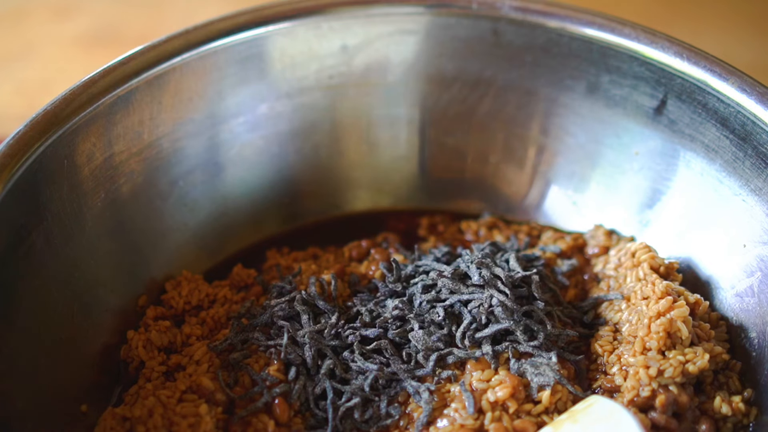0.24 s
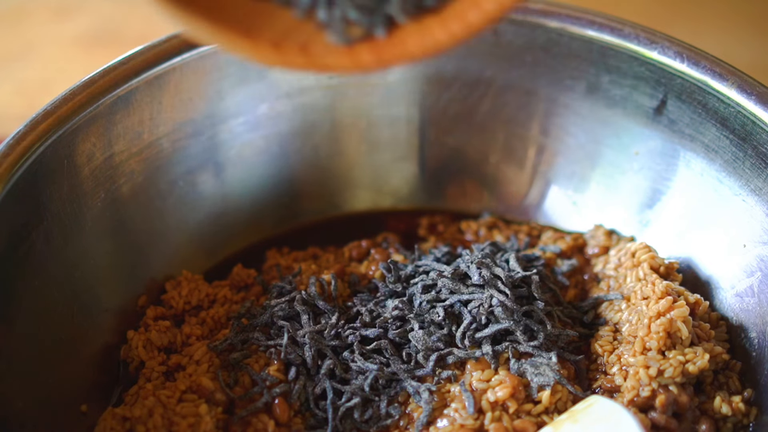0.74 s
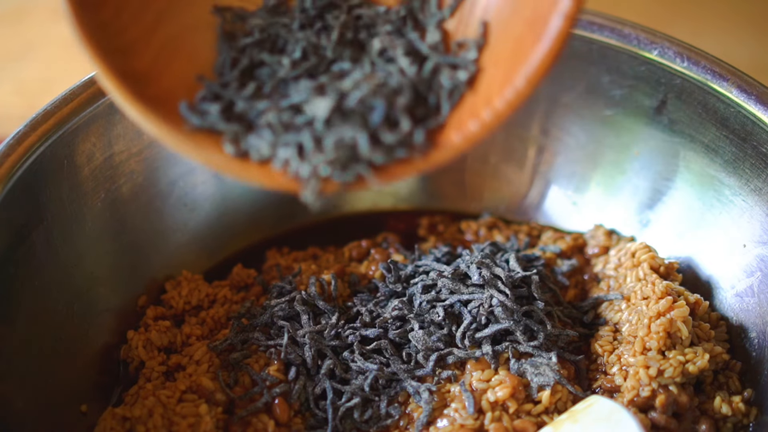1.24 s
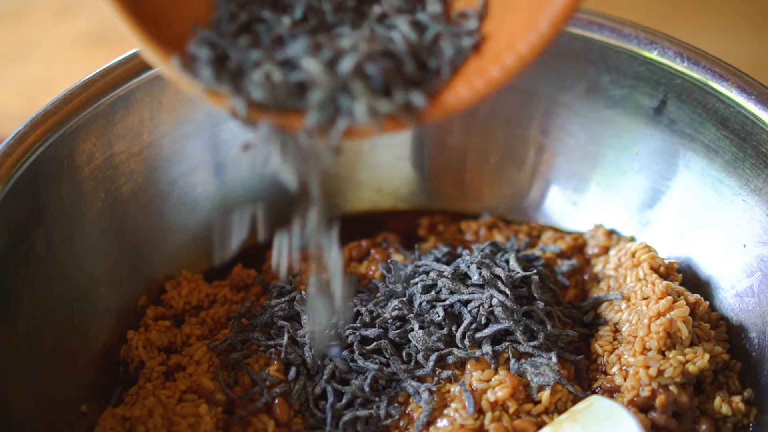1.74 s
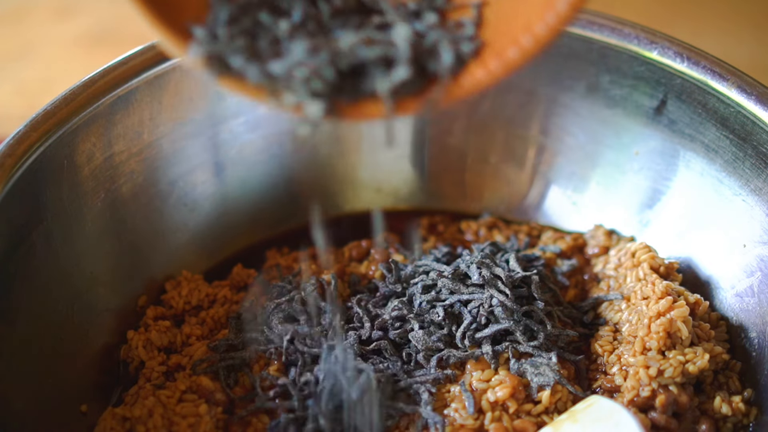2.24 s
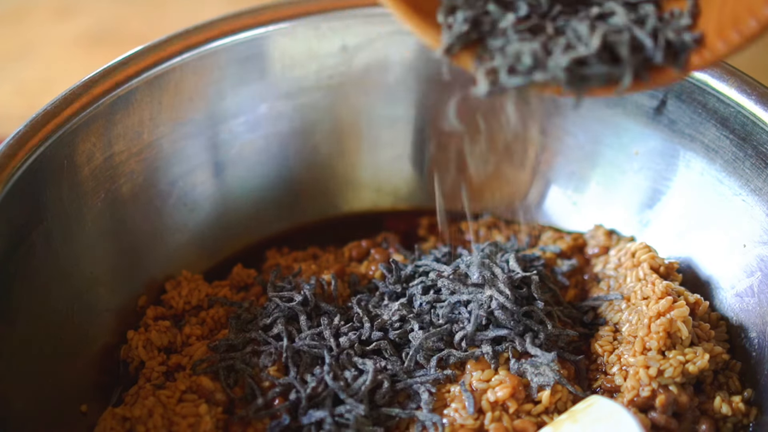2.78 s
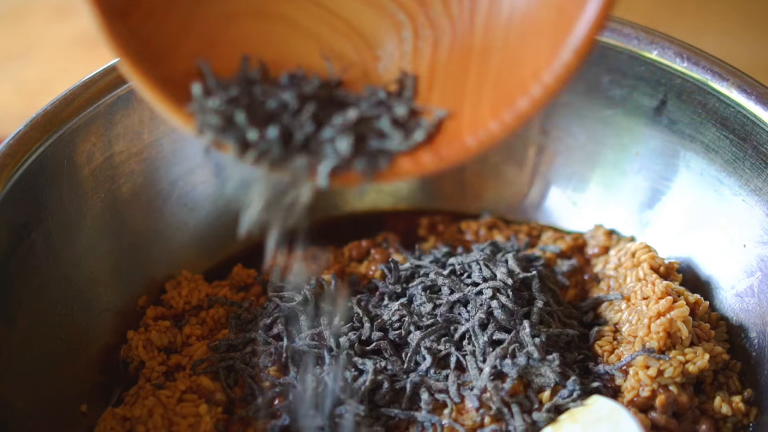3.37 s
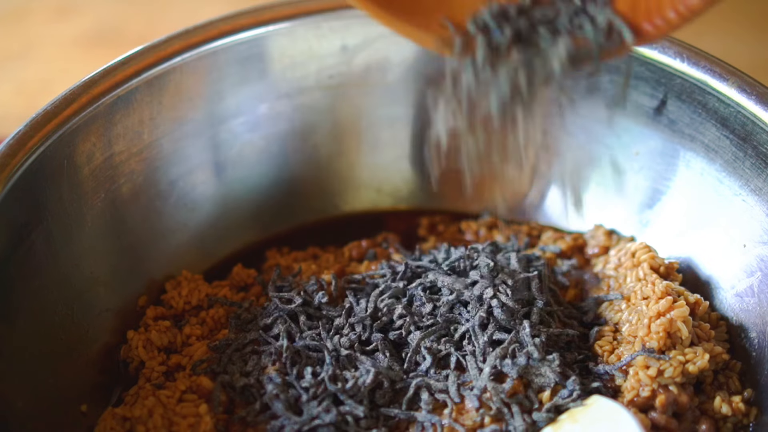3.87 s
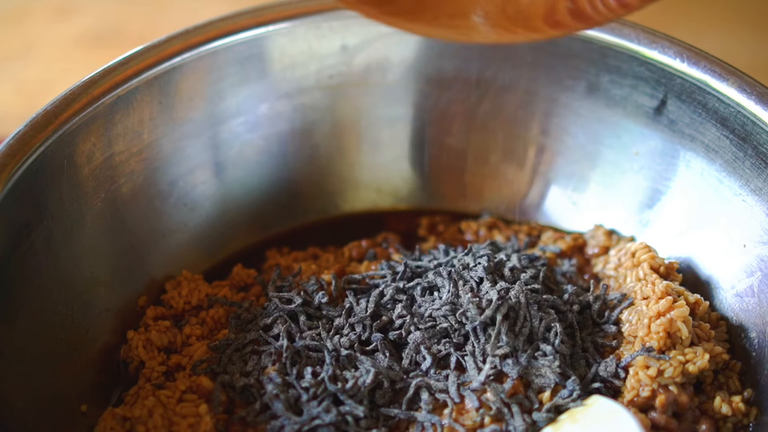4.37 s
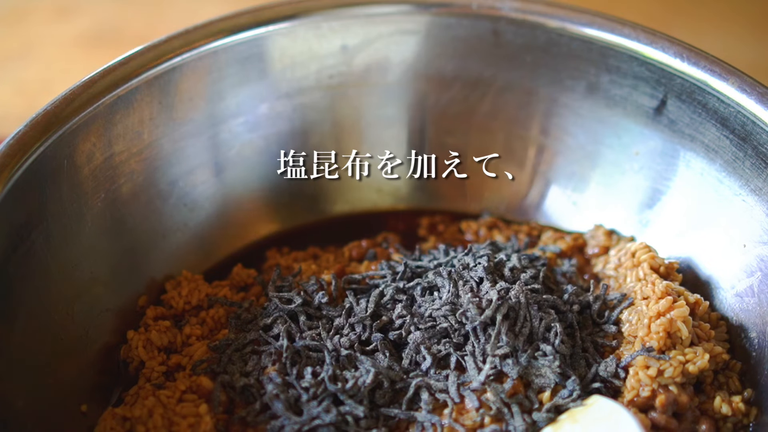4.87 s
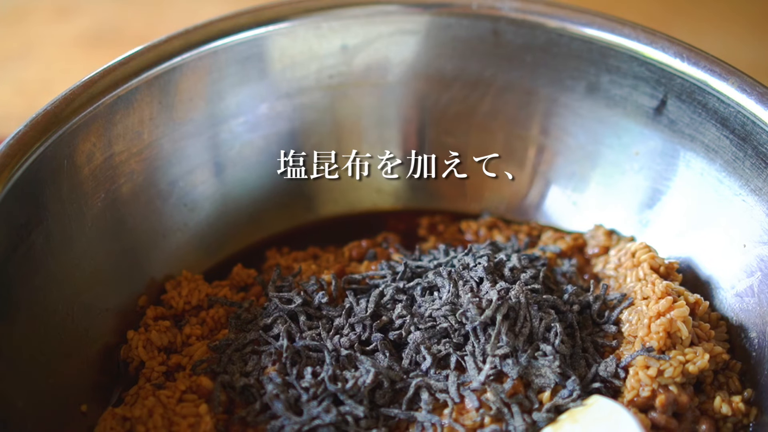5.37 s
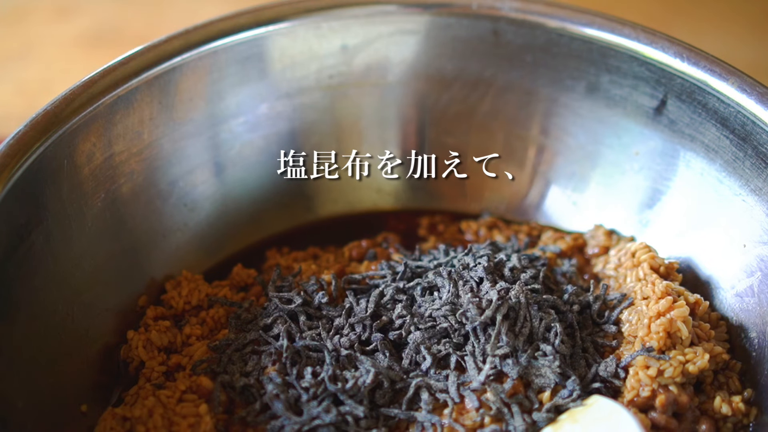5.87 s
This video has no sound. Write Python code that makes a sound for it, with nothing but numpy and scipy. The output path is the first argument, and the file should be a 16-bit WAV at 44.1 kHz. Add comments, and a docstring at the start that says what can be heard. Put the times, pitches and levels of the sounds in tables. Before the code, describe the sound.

Close to the microphone in a quiet kitchen, dried seaweed strips slide inside a small wooden bowl, making a series of short, dry rustles from about 0.2 to 1.3 seconds. At 1.5 seconds a fast, even shaking begins: a crisp, hissing rustle with a slightly hollow wooden colour, dotted with sharp ticks as stiff strips snap. Falling strips patter softly on moist food. The shaking eases briefly around 2.5 seconds, swells again near 3, then thins into a few brighter, separate shakes that end by about 4.2 seconds. Around 4.4 seconds the bowl meets the table with a light, dull knock, followed by faint dry rubbing. A louder wooden knock comes at about 5.8 seconds, with a small tap just after. The knocks sound a little further away, with slight room echo over a faint low hum.

```python
"""Short dry rustles come first, then a fast, even shaking with sharp ticks, and last two dull knocks.
Dried seaweed strips are tipped and shaken from a small wooden bowl onto moist food in a quiet kitchen.
Each slide over the wood is a rush of tiny contacts, coloured by the hollow of the bowl. Stiff strips
snap, and falling ones patter softly on the food. The knocks are the bowl meeting the table."""
import sys
import numpy as np
from scipy import signal
from scipy.fft import rfft, irfft, next_fast_len
from scipy.io import wavfile
from scipy.ndimage import uniform_filter1d, map_coordinates

SR = 44100
rng = np.random.default_rng(int(sys.argv[2]) if len(sys.argv) > 2 else 0)


def file_out(sig):
    """Save sig as 16-bit WAV at sys.argv[1]."""
    # one column per channel
    cols = np.atleast_2d(sig).T
    # limit, then scale
    lim = np.clip(cols, -1, 1)
    pcm = np.round(lim * 32767).astype(np.int16)
    wavfile.write(sys.argv[1], SR, pcm)


N = 270333
TIME = np.arange(N) / SR
SPILL_START_S, SPILL_END_S = 1.5, 4.2   # while strips spill over the rim

# resonances (favoured pitches) of the bowl's hollow: (frequency [Hz], width [Hz], boost [dB])
BOWL_RESONANCES = [(1225, 370, 9), (2693, 297, 17), (3485, 275, 12), (4150, 415, 12.5), (4480, 82, 10.5),
                   (5337, 420, 7), (6620, 50, 8.5), (8170, 76, 8), (8860, 110, 2.5), (11000, 170, 4)]


def from_db(db):
    """Turn decibels into a factor to multiply by."""
    return 10 ** (np.asarray(db) / 20)


def unit_power(x):
    """Scale a signal to an average power of one."""
    return x / np.sqrt(np.mean(x ** 2) + 1e-20)


def over_time(points):
    """Join (time, value) points with straight lines, one value per sample."""
    return np.interp(TIME, *np.transpose(points))


def at_hz(points, hz):
    """Read between (frequency, value) points on a logarithmic frequency axis."""
    known_hz, values = np.transpose(points)
    return np.interp(np.log(hz + 1), np.log(known_hz), values)


def decay(t, fade_s):
    """A fade that drops by 60 dB in fade_s seconds."""
    return np.exp(-np.log(1000) * t / fade_s)


def colour(x, spectrum, resonances=()):
    """Give a sound a smooth tone colour plus resonant peaks, at a power of one."""
    size = 2 * next_fast_len(N)
    hz = np.arange(size // 2 + 1) * SR / size
    db = at_hz(spectrum, hz)
    for centre_hz, width_hz, boost_db in resonances:
        db = db + boost_db / (1 + (2 * (hz - centre_hz) / width_hz) ** 2)
    cepstrum = irfft(np.log(from_db(db)))
    cepstrum[1:size // 2] *= 2   # fold the filter so that nothing sounds before its cause
    cepstrum[size // 2 + 1:] = 0
    response = np.exp(rfft(cepstrum))
    return unit_power(irfft(rfft(x, size) * response)[:N])


def ring(force, hz, fade_s):
    """A struck surface answers each push with a fading tone."""
    damping = from_db(-60 / (fade_s * SR))
    angle = 2 * np.pi * hz / SR
    return signal.lfilter([.5, 0, -.5], [1, -2 * damping * np.cos(angle), damping ** 2], force + 1e-18)


def add(track, time_s, sound):
    """Mix a short sound into a track."""
    start = int(np.clip(round(time_s * SR), 0, N - 1))
    track[start:start + len(sound)] += sound[:N - start]


def swell(peak_s, level_db, rise_s, fall_s):
    """Power that rises smoothly to a peak and falls again."""
    distance = (TIME - peak_s) / np.where(TIME < peak_s, rise_s, fall_s)
    return from_db(level_db) ** 2 / (1 + distance ** 2 / 3) ** 4


def slide(start_s, length_s, level_db, rise_share=0.082, fall_share=0.16):
    """Power of one slide: it builds, holds and dies away, more gently if it is long."""
    rise = 1 + np.tanh((TIME - start_s) / (2 * rise_share * length_s))
    fall = 1 + np.tanh((start_s + length_s - TIME) / (2 * fall_share * length_s))
    return from_db(level_db) ** 2 * (rise / 2) * (fall / 2)


def grains(per_s, spread_db):
    """Tiny random contacts of uneven size, with the same average power at any rate."""
    chance = np.clip(per_s / SR, 1e-4, 1)
    sizes = from_db(spread_db * np.clip(rng.standard_normal(N), -3, 2.6))
    hits = rng.random(N) < chance
    return hits * unit_power(sizes) * rng.choice([-1, 1], N) / np.sqrt(chance)


def clumps(per_s, depth_db):
    """An uneven level: tangled strips catch and let go together."""
    drift = uniform_filter1d(rng.standard_normal(N), max(int(SR / per_s), 2))
    return unit_power(from_db(depth_db * unit_power(drift)))


def background(noise_db=-47.0):
    """Low room rumble, hiss, a steady hum and a faint electrical whine."""
    # hum and whine: (frequency [Hz], level [dB])
    tones = [(96.9, -53), (7127, -72), (13873, -68), (14250, -72)]
    # rumble and hiss: (frequency [Hz], relative level [dB])
    spectrum = [(20, -10), (45, -0.5), (95, -4), (125, -3), (170, -10.5), (300, -19.5), (600, -25),
                (1250, -30), (1900, -34), (3200, -36), (5000, -32.5), (7000, -34.5), (8300, -37),
                (9400, -30.5), (12000, -37), (14500, -30)]
    hum = sum(from_db(db) * np.sqrt(2) * np.sin(2 * np.pi * (hz * TIME + rng.random()))
              for hz, db in tones)
    return from_db(noise_db) * colour(rng.standard_normal(N), spectrum) + hum


def kitchen_echo(sound, gap_s=0.0033):
    """The walls return a blur of reflections that dies sooner in the treble."""
    # how long the room rings: (frequency [Hz], time to fade by 60 dB [s])
    fade_times = [(100, 0.63), (400, 0.36), (1200, 0.41), (3500, 0.24), (10000, 0.12)]
    t, echo = TIME[:int(.7 * SR)], 0
    edges_hz = np.geomspace(120, 16000, 8)
    for low, high in zip(edges_hz, edges_hz[1:]):
        band_filter = signal.butter(2, [low, high], "band", fs=SR, output="sos")
        band = signal.sosfilt(band_filter, rng.standard_normal(len(t)))
        echo = echo + band * decay(t, at_hz(fade_times, np.sqrt(low * high)))
    echo = echo * (t > gap_s)
    return signal.fftconvolve(sound, echo / np.linalg.norm(echo))[:N]


def handling():
    """Fingers rub on the bowl as it is turned, and the moving arm makes the table rumble."""
    # shifts of the hand: (peak time [s], level [dB], rise [s], fall [s])
    grips = [(0.499, -60, 0.075, 0.06), (3.06, -48, 0.021, 0.054), (4.06, -42, 0.036, 0.029),
             (5.19, -51, 0.04, 0.048)]
    # skin on wood: (frequency [Hz], relative level [dB])
    rub_spectrum = [(100, -35), (280, 3.5), (450, -7.5), (750, -11), (1500, -36), (4000, -46)]
    # table rumble: (time [s], level [dB])
    rumble_levels = [(0, -32.5), (.13, -54.5), (1.55, -67), (1.76, -46), (2.3, -39), (2.6, -48),
                     (4.25, -47.5), (4.6, -42), (6.1, -40)]
    # its tone colour: (frequency [Hz], relative level [dB])
    rumble_spectrum = [(20, -20.5), (42, -12), (70, 1), (115, 0.5), (160, -17.5), (260, -27), (600, -52.5),
                       (2000, -52), (8000, -66)]
    rub = np.sqrt(sum(swell(*row) for row in grips)) * colour(rng.standard_normal(N), rub_spectrum)
    rumble = from_db(over_time(rumble_levels)) * colour(rng.standard_normal(N), rumble_spectrum)
    return rub + rumble


def hand_bump(time_s=.3, peak_db=-25, length_s=0.0151):
    """The hand gives one low push and pull, with no ringing."""
    progress = np.clip((TIME - time_s) / length_s, 0, 1)
    return from_db(peak_db) * np.sin(2 * np.pi * progress)


def brushing():
    """Faint dry rubbing while the emptied bowl is carried off."""
    # soft brushes: (peak time [s], level [dB], rise [s], fall [s])
    brushes = [(4.468, -47, 0.005, 0.015), (4.7, -54, 0.17, 0.21), (5.06, -49.5, 0.07, 0.088),
               (6.07, -57.5, 0.009, 0.055)]
    # their tone colour: (frequency [Hz], relative level [dB])
    spectrum = [(400, -20), (1300, -2), (2200, -3.5), (4000, 0.5), (5200, -10), (8300, -3.5), (10000, -10),
                (15000, -18)]
    # resonances of the rubbed wood: (frequency [Hz], width [Hz], boost [dB])
    resonances = [(4330, 300, 8), (8100, 630, 0)]
    level = np.sqrt(sum(swell(*row) for row in brushes))
    return level * colour(grains(6000, spread_db=2.5), spectrum, resonances)


def bowl_knocks(clatter_db=-15.5, clatter_rise_s=0.0018, clatter_fade_s=0.23, firm_s=0.0028):
    """Long soft contacts mostly move the table top; short hard ones also make the bowl ring and clatter."""
    # the bowl meets the table: (time [s], strength [dB], contact time [s])
    contacts = [(4.046, -16, 0.0077), (4.399, -9.5, 0.0091), (4.428, -17, 0.0069), (5.8318, -3, 0.002),
                (5.8360, -3, 0.0026), (5.8434, 7.5, 0.0062), (6.127, -7.5, 0.001)]
    # tones of table and bowl: (frequency [Hz], relative level [dB], time to fade by 60 dB [s])
    tones = [(43.4, -15.5, 0.41), (64.5, -12, 0.42), (96.7, -12.5, 0.22), (195, -23.5, 0.22),
             (299.5, -6, 0.12), (391, -11, 0.14), (438, -5.5, 0.035), (591, -12.5, 0.18), (800, -18, .1),
             (1077, -19, .1), (1280, -20, .09), (2650, -30, .15), (3500, -32, .14)]
    # clatter of the bowl's foot: (frequency [Hz], relative level [dB])
    foot_spectrum = [(100, -4.5), (400, 0.5), (750, -4.5), (1250, -11.5), (1600, -26.5), (2200, -37),
                     (3800, -40.5), (5000, -52), (9000, -69)]
    # its resonances: (frequency [Hz], width [Hz], boost [dB])
    foot_resonances = [(1830, 150, 11), (2590, 250, 13), (3500, 160, 16)]
    force, clatter_level, t = np.zeros(N), np.zeros(N), TIME[:SR // 2]
    rattle = np.minimum(t / clatter_rise_s, 1) * decay(t, clatter_fade_s)
    for time_s, db, contact_s in contacts:
        push = np.sin(np.pi * np.minimum(TIME[:SR // 25] / contact_s, 1)) ** 2
        add(force, time_s, from_db(db) * push / push.sum())
        add(clatter_level, time_s, from_db(db) * np.exp(-contact_s / firm_s) * rattle)
    ringing = sum(from_db(db) * ring(force, hz, fade_s) for hz, db, fade_s in tones)
    wood_noise = colour(rng.standard_normal(N), foot_spectrum, foot_resonances)
    return ringing + from_db(clatter_db) * clatter_level * wood_noise


def landing_strips(power, drop_s=.07, relative_db=-28):
    """What slides over the rim lands a moment later; the moist food takes it with a dull patter."""
    # whole tangles dropping: (peak time [s], level [dB])
    tangles = [(3.07, -44.5), (3.27, -42)]
    # soft landing: (frequency [Hz], relative level [dB])
    spectrum = [(120, -14), (350, -3), (700, -0.5), (1300, -2), (2100, 4), (3500, -8), (9000, -17)]
    spilled = power * (TIME > SPILL_START_S) * (TIME < SPILL_END_S)
    trickle = from_db(relative_db) ** 2 * np.interp(TIME - drop_s, TIME, spilled)
    lumps = sum(swell(time_s, db, rise_s=0.042, fall_s=0.056) for time_s, db in tangles)
    return np.sqrt(trickle + lumps) * colour(grains(2200, spread_db=7.0), spectrum)


def creeping_strips():
    """A slowly moving heap stays on the wood, so mostly the bowl's wall is heard."""
    # slow slips in the tilted bowl: (start [s], length [s], level [dB])
    slips = [(0.068, 0.05, -40.5), (.11, .09, -40.5), (.445, .06, -33), (0.55, .035, -34),
             (0.682, 0.02, -38), (0.972, 0.1, -39), (1.305, .07, -40), (1.441, 0.031, -39.5)]
    # gentle rubbing: (frequency [Hz], relative level [dB])
    spectrum = [(300, -22), (1200, -0.5), (2250, -13), (2600, 0), (4400, 3), (4900, -4.5), (5600, 3.5),
                (8700, -8), (9600, -10), (12500, -8), (15000, -9)]
    # resonances of the wall: (frequency [Hz], width [Hz], boost [dB])
    resonances = [(2730, 420, 11.5), (3440, 250, 17), (4220, 380, 11.5), (6500, 210, 9.5), (8030, 440, 14),
                  (8950, 480, 13), (12400, 1200, 6)]
    level = np.sqrt(sum(slide(*row) for row in slips))
    return level * colour(grains(5000, spread_db=6.0), spectrum, resonances)


def stray_snaps(power, per_s=16):
    """Rows of extra snaps at random times and pitches, stronger when the slide is louder."""
    count = int(per_s * (SPILL_END_S - SPILL_START_S))
    # ranges of time [s], strength above the slide [dB] and pitch [Hz]
    low, high = np.transpose([(SPILL_START_S, SPILL_END_S), (3, 15), (4000, 11003)])
    times, above_db, hz = rng.uniform(low, high, (count, 3)).T
    slide_db = 10 * np.log10(np.interp(times, TIME, power))
    return list(zip(times, slide_db + above_db, hz))


def snapping_strips(power, gain_db=-8.0, crack_db=-4.0, crack_growth=0.7, fade_s=.009, width_hz=2200):
    """A stiff strip chatters briefly around its own pitch; a harder snap adds more broad crack."""
    # the main snaps: (time [s], strength [dB], pitch [Hz])
    snaps = [(1.8697, -9, 7200), (2.063, -10, 3456), (2.168, -9, 7600), (2.193, -5, 3770),
             (2.283, -12, 3160), (2.4273, -19, 5950), (2.5024, -19.5, 8900), (2.5878, -26, 8650),
             (2.9690, -8.5, 5285), (3.1388, -8.5, 3200), (3.2412, -13, 3728), (3.2558, -7, 3740),
             (3.3007, -15, 3400), (3.62, -16, 5820), (3.758, -20, 7060), (3.9105, -18, 7000),
             (4.1416, -25, 9200), (4.193, -20.5, 8900), (4.643, -19, 10900)]
    track, t = np.zeros(N), TIME[:SR // 25]
    loudest_db = max(db for _, db, _ in snaps)
    for time_s, db, hz in list(snaps) + stray_snaps(power):
        chatter = rng.choice([-1., 1.], len(t)) * decay(t, fade_s)
        resonance = signal.iirpeak(hz, hz / width_hz, fs=SR)
        pitched = signal.lfilter(*resonance, signal.lfilter(*resonance, chatter))
        body = unit_power(pitched) * np.std(chatter)
        crack = from_db(crack_db + crack_growth * (db - loudest_db)) * chatter
        add(track, time_s, from_db(db + gain_db) * (body + crack))
    return signal.sosfilt(signal.butter(2, 2000, "high", fs=SR, output="sos"), track)


def tipping():
    """Power of the slides started by single tips of the bowl."""
    # one slide per tip: (start [s], length [s], level [dB])
    tips = [(0.234, 0.026, -28), (0.295, 0.05, -32), (0.435, 0.069, -24.5), (0.547, 0.046, -28),
            (0.677, 0.06, -26), (0.849, 0.053, -27), (0.937, 0.14, -36.5), (1.118, 0.071, -23),
            (1.246, 0.039, -25.5), (3.681, 0.056, -30), (3.793, 0.059, -26.5), (3.891, 0.085, -29),
            (4.0, 0.089, -35.5), (4.099, 0.029, -35.5), (4.182, 0.035, -40.5)]
    return sum(slide(*row) for row in tips)


def shaking(first_stroke_s=1.513, turn_dip_db=9, fade_db_per_s=398):
    """Power of the steady shaking: one rush per stroke, and a dip as the strips slow at each turn."""
    # pace of the wrist: (time [s], rate [strokes per s])
    pace = [(1.5, 14.1), (2.6, 14.25), (2.8, 15.2), (3.5, 14.3)]
    # effort of the shaking: (time [s], level at mid-stroke [dB])
    effort = [(1.46, -44), (1.505, -26.5), (1.59, -20.5), (1.86, -28.5), (2.05, -20.5), (2.31, -23.5),
              (2.52, -42), (2.64, -28.5), (2.78, -30.5), (2.93, -22), (3.12, -27.5), (3.39, -28.5),
              (3.52, -36.5), (3.64, -32)]
    strokes = np.cumsum(over_time(pace)) / SR
    strokes -= np.interp(first_stroke_s, TIME, strokes)
    speed = np.abs(np.cos(np.pi * strokes))
    at_turn = from_db(-turn_dip_db) ** 2
    rush = at_turn + (1 - at_turn) * speed ** 3
    outside_s = np.abs(TIME - np.clip(TIME, effort[0][0], effort[-1][0]))   # before or after the shaking
    effort_db = over_time(effort) - fade_db_per_s * outside_s
    return rush * (from_db(effort_db) * clumps(per_s=14, depth_db=1.58)) ** 2


def shifting_hollow(rustle):
    """The moving heap shifts the bowl's resonances together and drives each more or less strongly."""
    # the hollow rings a little higher while the heap fills it: (time [s], frequency [ratio])
    tuning = [(0, 1.02), (.47, 1.027), (.75, 1.01), (1.15, 1), (1.6, .99), (2.2, 1.0), (3.0, 0.99),
              (4.2, 1.007)]
    read_position = np.cumsum(over_time(tuning))
    retuned = map_coordinates(rustle, [read_position], order=5, mode="mirror")
    flicker = 0
    for hz, width_hz, _ in BOWL_RESONANCES:
        band = signal.lfilter(*signal.iirpeak(hz, hz / width_hz, fs=SR), retuned)
        flicker = flicker + band * (clumps(per_s=12, depth_db=2.5) - 1)
    return retuned + flicker


def sliding_strips(power, rim_share=0.041, split_hz=5800, treble_db=6.5, usual_db=-23.5):
    """Dry strips rush over the wood; harder shakes make more contacts and a brighter sound."""
    # dry strips on wood: (frequency [Hz], relative level [dB])
    friction = [(150, -30), (400, -19), (900, -17), (1750, -17), (2200, -14), (2600, -5), (4900, -4.5),
                (6000, -.5), (8500, -1), (10200, -4.5), (13000, -4), (15000, -5)]
    # how much of the heap is still sliding: (time [s], share [0-1])
    heap_left = [(0, 0.83), (1.7, 0.94), (1.85, 0.49), (3.1, 0.42), (3.6, 0.3), (4.2, 0.06)]
    # brightness, highest for the last loose strips: (time [s], extra treble [dB])
    brightness = [(.28, 4), (.5, -1.5), (1.55, -2.5), (2.03, 1), (2.8, -0.5), (3.35, -4.5), (3.55, 3),
                  (4.0, 3), (4.15, 8.5)]
    heap = over_time(heap_left)
    contacts_per_s = 1500 + 20000 * heap * np.sqrt(power / power.max())   # a thin heap crackles
    contacts = grains(contacts_per_s, spread_db=2.0) * clumps(per_s=480, depth_db=1.84)
    in_bowl = shifting_hollow(colour(contacts, friction, BOWL_RESONANCES))
    # strips that leave over the rim crackle in the open, without the hollow's colour
    loose = colour(grains(per_s=450, spread_db=0.5), friction)
    loose_share = np.clip(rim_share / heap, 0, 1)
    rustle = np.sqrt(1 - loose_share) * in_bowl + np.sqrt(loose_share) * loose
    lows = signal.sosfiltfilt(signal.butter(2, split_hz, fs=SR, output="sos"), rustle)
    speed_db = 0.26 * (10 * np.log10(power) - usual_db)   # faster sliding adds treble
    tilt_db = treble_db + over_time(brightness) + speed_db
    high_power = power / (1 + from_db(-tilt_db) ** 2)
    low_power = np.maximum(power - high_power, 0)
    return np.sqrt(low_power) * unit_power(lows) + np.sqrt(high_power) * unit_power(rustle - lows)


def scene(pour_echo_db=-18.5, knock_echo_db=-16.0):
    """The pouring is close by; the knocks come from further off and carry more of the room's echo."""
    power = shaking() + tipping() + 1e-12
    strips = sliding_strips(power) + creeping_strips() + snapping_strips(power) + landing_strips(power)
    pour = strips + handling() + brushing() + hand_bump()
    knocks = bowl_knocks()
    echo = kitchen_echo(from_db(pour_echo_db) * pour + from_db(knock_echo_db) * knocks)
    return (pour + knocks + echo + background())[None]


def record(dry, ceiling=0.91, cutoff_hz=15120):
    """Round off the loudest peaks and cut the highest treble steeply."""
    rounded = dry / (1 + (dry / ceiling) ** 4) ** (1 / 4)
    return signal.sosfilt(signal.ellip(12, .1, 90, cutoff_hz, fs=SR, output="sos"), rounded)


dry = scene()
out = record(dry)
file_out(out)
```